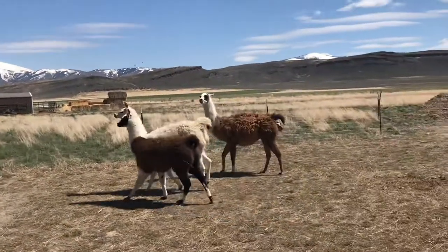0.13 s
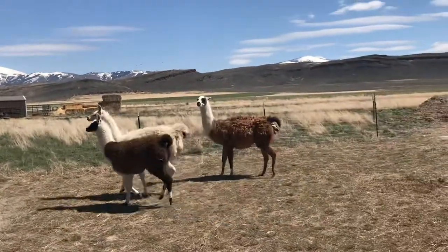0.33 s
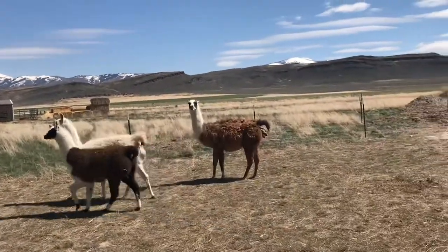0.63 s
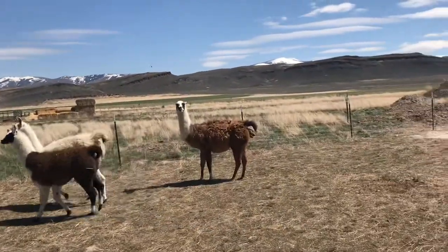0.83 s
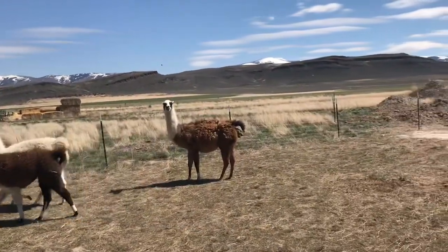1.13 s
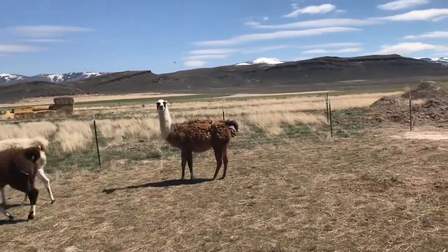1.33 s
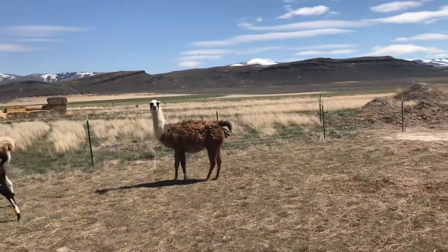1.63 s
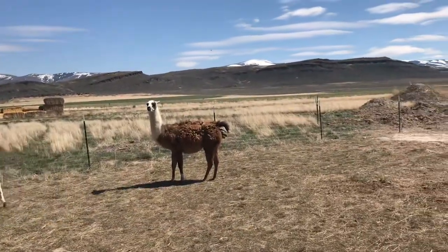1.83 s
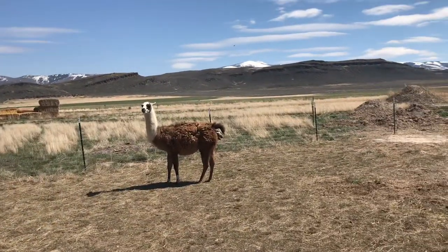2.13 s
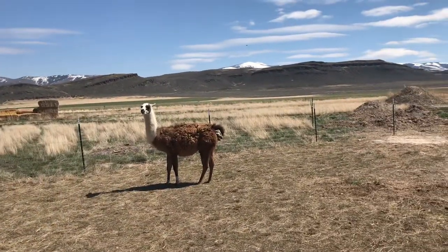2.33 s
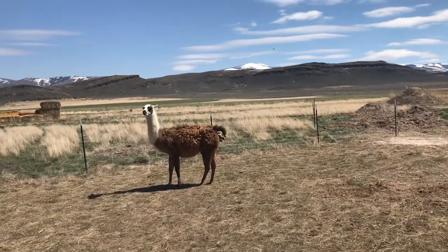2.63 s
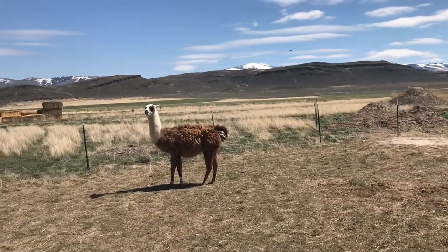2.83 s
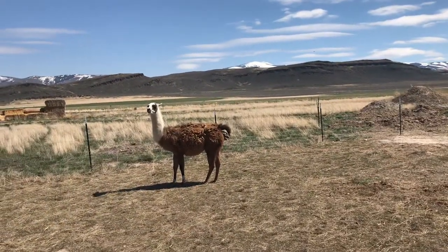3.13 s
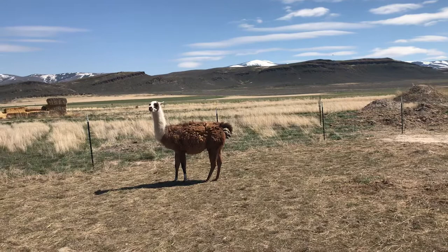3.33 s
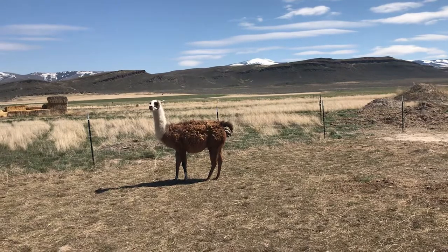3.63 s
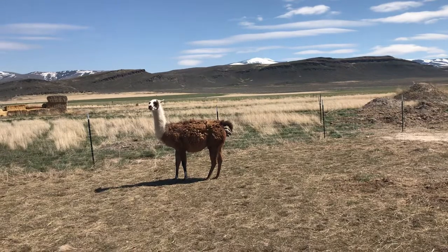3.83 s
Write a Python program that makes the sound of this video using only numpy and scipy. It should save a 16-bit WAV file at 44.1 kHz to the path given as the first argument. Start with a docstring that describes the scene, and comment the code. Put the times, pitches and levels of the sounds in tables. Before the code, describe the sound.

Wind buffets a small unprotected microphone in an open, dry pasture. The first 0.8 seconds are fairly calm, with low rumble, a couple of thumps, slight grass rustles and a tiny chirp. Gusts build from 0.85, turning loud, rasping and crackly around 1.5-1.8 and 2.5-2.8, then easing unevenly to 4.0. A very faint, nasal llama hum rises about 1.3-2.2, dipping last; faint distant chirps recur near 2.9.

```python
"""Gusty wind on a pasture microphone

Eddies of wind reach a small microphone: slow ones thump it as short swings of low pressure, and fast ones
tear into rasping puffs of noise whose treble grows with their strength. Coloured noise gives the rumble,
the flutter, the hiss of the field and the rustle of dry grass. Small birds chirp far off as gliding sines,
and an animal gives one thin, nasal hum, a sum of harmonics that rises and dips at its end.
"""
import sys
import numpy as np
from scipy import signal
from scipy.fft import rfft, irfft, next_fast_len
from scipy.io import wavfile
from scipy.ndimage import uniform_filter1d, minimum_filter1d, map_coordinates

SR = 44100
rng = np.random.default_rng(int(sys.argv[2]) if len(sys.argv) > 2 else 0)


def store_wav(level_fs):
    """Save 16-bit WAV to argv[1]."""
    pcm = np.round(np.clip(np.atleast_2d(level_fs), -1, 1) * 32767)
    wavfile.write(sys.argv[1], SR, pcm.T.astype(np.int16))


N = 176400  # samples: four seconds

# Rumble of the wind between the eddies, before RUMBLE_DB: time_s, level_db
RUMBLE_LEVEL = [(0, -30), (.3, -28.5), (.65, -34), (.85, -18.5), (1.05, -32), (1.5, -20.5), (2.0, -26),
                (2.3, -24), (2.6, -24), (3.1, -24.5), (3.4, -26.5), (3.8, -26), (3.93, -31), (4.0, -39.5)]
# Low-mid flutter of small eddies: time_s, level_db
FLUTTER_LEVEL = [(0, -47.5), (.7, -49.5), (.85, -39), (1.15, -43.5), (1.4, -28.5), (1.8, -38), (2.3, -38),
                 (2.65, -34), (2.9, -36.5), (3.15, -41), (3.35, -39.5), (3.57, -33.5), (3.8, -42.5),
                 (3.94, -35), (4.0, -46)]
# Relative spectra of the rumble and the flutter: frequency_hz, density_db
RUMBLE_COLOUR = [(15, -43), (24, -23.5), (32, -20), (45, -1), (65, -1), (100, -6), (160, -10.5), (300, -27),
                 (600, -63), (1500, -83)]
FLUTTER_COLOUR = [(40, -19), (120, -6), (220, 5), (400, -5), (650, -10.5), (1200, -33.5), (2500, -70)]
RUMBLE_DB = -1
FLUTTER_SLOW_DB, FLUTTER_FAST_DB = 8, 10  # limits of the swings drawn at 35 and 150 knots a second

# Hiss of the open field: time_s, level_db
AIR_LEVEL = [(0, -53), (.45, -54.5), (.55, -61.5), (.95, -54.5), (1.05, -60.5), (1.22, -60), (1.3, -54.5),
             (2.2, -53), (2.5, -54.5), (3.5, -55.5), (4, -58.5)]
# Rustles of dry grass: centre_s, length_s (two standard deviations), level_db
RUSTLES = [(0.094, 0.052, -63), (0.292, 0.014, -57.5), (0.342, 0.029, -53.5), (0.463, 0.02, -58.5),
           (0.617, 0.087, -61.5), (0.792, 0.093, -64.5), (0.976, 0.026, -61), (1.263, .03, -58.5),
           (1.685, 0.033, -61.5), (2.142, .025, -61.5), (3.669, 0.055, -62.5)]
# Tiny high ticks: centre_s, level_db
TICKS = [(3.361, -51.5), (3.574, -52.5), (3.798, -53), (3.895, -52.5)]
# Relative spectra of the hiss, the grass and the ticks: frequency_hz, density_db
AIR_COLOUR = [(100, -0.5), (400, 3.5), (900, -4), (2000, -16), (4000, -18), (5500, -22), (9000, -23),
              (10400, -27), (12000, -23), (15800, -24)]
GRASS_COLOUR = [(500, -11.5), (1500, 2), (4000, -1.5), (6000, -3.5), (10000, -5), (13000, 0), (15800, -7.5)]
TICK_COLOUR = [(3000, -40), (8000, -11), (12000, -3.5), (15500, -3)]

# Bird chirps, before CHIRP_DB: start_s, length_s, first_hz, middle_hz, last_hz, level_db
CHIRPS = [(0, 0.013, 4100, 4390, 2950, -57), (0.291, 0.0095, 3000, 3400, 2980, -53.5),
          (1.031, 0.012, 3200, 3450, 3900, -68), (1.088, 0.02, 2140, 3110, 2200, -57),
          (2.342, .06, 3550, 3870, 4220, -68), (2.852, 0.039, 4600, 4350, 3750, -63.5),
          (2.886, 0.044, 4000, 3470, 3100, -63.5)]
CHIRP_DB = 5.5

# Slow eddies pushing on the diaphragm, before THUMP_WIDTH and THUMP_DB: centre_s, length_s, level_db
THUMPS = [(0.41, 0.0087, -10.5), (0.484, 0.028, -13), (0.775, 0.027, -17.5), (0.858, 0.032, -25),
          (0.96, 0.0087, -23), (1.167, 0.015, -9.5), (1.303, 0.058, -20.5), (1.489, 0.016, -9.5),
          (1.579, 0.016, -4.5), (1.786, 0.024, -7.5), (1.876, 0.015, -11.5), (1.957, 0.011, -5.5),
          (2.116, 0.02, -13.5), (2.201, 0.038, -13.5), (2.41, 0.091, -18), (2.523, 0.041, -10.5),
          (2.709, 0.029, -13), (2.767, 0.0093, -6.5), (2.979, 0.024, -15), (3.043, 0.021, -25),
          (3.1, 0.024, -14.5), (3.178, 0.037, -13.5), (3.637, 0.096, -23)]
THUMP_HZ, THUMP_SPREAD = 71.5, 0.18  # middle swing frequency and its relative spread
THUMP_WIDTH, THUMP_DB = 0.45, -3  # standard deviation of the swell per length; overall level

# Fast eddies, before PUFF_WIDTH and PUFF_DB: centre_s, length_s, level_db,
# reach_hz (where the turbulence falls by 20 dB at unit strength)
PUFFS = [(0.47,0.033,-39.5,1504), (0.573,0.0049,-20.5,677), (0.595,0.024,-32,550), (.725,0.0034,-40,1600),
         (0.852,0.027,-21.5,560), (.875,0.0098,-19,600), (.901,0.021,-22,604), (0.953,0.014,-19,848),
         (0.996,0.0065,-29,526), (1.025,0.012,-32,548), (1.047,0.0064,-34,552), (1.104,0.0086,-29.5,466),
         (1.169,0.01,-37.5,560), (1.21,0.0093,-31.5,513.5), (1.29,.014,-16.5,770), (1.338,0.014,-22,734),
         (1.414,0.028,-27,707), (1.481,0.021,-13,1406), (1.56,0.0047,-24.5,796.5), (1.584,0.028,-23,676),
         (1.627,0.0045,-14.5,1501.5), (1.689,0.0063,-24,896), (1.714,0.0092,-12,1752),
         (1.729,0.0068,-7.5,1801), (1.743,0.012,-9.5,1702.5), (1.778,0.023,-12.5,1551),
         (1.814,0.0084,-13.5,1603), (1.943,0.022,-19.5,911), (2.016,0.024,-19.5,747), (2.108,0.009,-25,736),
         (2.146,0.011,-21,1042), (2.172,0.021,-22,1069), (2.216,0.009,-18,776), (2.382,0.011,-24.5,983),
         (2.418,0.013,-19,778), (2.491,0.012,-15,899), (2.501,0.0014,-11,1902), (2.513,0.018,-10,1255.5),
         (2.538,0.0094,-12,1396), (2.565,0.018,-14.5,1148), (2.6,0.005,-18.5,1597), (2.693,0.02,-18,1154),
         (2.738,0.034,-24.5,1099.5), (2.777,0.0097,-3,2301), (2.811,0.013,-15,621), (2.857,0.012,-24.5,660),
         (2.983,.031,-23,668), (3.024,0.011,-13,1204), (3.052,0.021,-16,774), (3.104,0.031,-25,925),
         (3.16,0.0071,-20,1298), (3.187,0.029,-14.5,1309), (3.27,0.028,-34,780), (3.364,.012,-19,1198),
         (3.46,0.012,-25.5,1145), (3.499,0.0078,-17.5,580), (3.639,0.012,-20.5,750),
         (3.654,0.023,-15.5,980), (3.711,0.031,-26,480), (3.775,0.023,-22,635), (3.803,0.0068,-19,520),
         (3.822,0.01,-21.5,527), (3.881,0.0097,-23.5,699), (3.931,0.03,-28.5,509)]
# Spectrum of the turbulence before that fall: frequency_hz, density_db
PUFF_COLOUR = [(30, -22.5), (80, -3), (150, 3.5), (300, 1.5), (600, 3), (950, 0.5), (1300, 1), (2000, -3),
               (3200, -1.5), (6000, 1.5), (9000, -3)]
PUFF_DB, PUFF_SKIRT, PUFF_WIDTH = 1.5, 0.99, 0.39  # overall level; exponent and width per length of a swell
CRACKLE_DB, CRACKLE_RATE = 4, 360  # limit of the roughness inside a puff; its knots a second
BRIGHTEN = 0.39  # the reach grows as this power of the momentary strength
FAST_HZ = 2000  # reach at which the thinning below applies in full
THIN_DB, THIN_HZ = 7.5, 436  # bass loss towards 0 Hz, and the frequency scale over which it dies away
BAND_HZ = np.geomspace(150, 9600, 13)  # centres of the bands of turbulence

# Pitch of the animal's hum, before a slight unsteadiness: time_s, pitch_hz
HUM_PITCH = [(1.3, 251), (1.43, 254), (1.49, 261), (1.55, 267), (1.68, 271), (1.8, 278.5), (1.95, 283),
             (2.08, 280), (2.125, 276), (2.17, 258)]
# Level of the hum: time_s, level_db
HUM_LEVEL = [(1.3, -76), (1.38, -64), (1.55, -64.5), (1.68, -62), (1.8, -60.5), (1.95, -58), (2.08, -60.5),
             (2.125, -62), (2.17, -72)]
# Relative strength of its harmonics, interpolated between rows: harmonic_number, level_db
HARMONICS = [(1, -8), (4, -8), (5, -5), (6, -2), (7, -11), (8, -7), (9, -7), (10, -17), (11, -19),
             (12, -12), (13, -2), (14, -11), (15, 4), (16, -6), (17, -7), (18, -22), (24, -23), (28, -14),
             (31, -19), (35, -32)]

LOW_CUT_HZ, TOP_HZ = 29, 15800  # microphone passes half the amplitude here; upper band limit
CEILING_DB = -0.15  # limiter ceiling, relative to full scale


def amp(db):
    """Decibel law: twenty decibels are a tenfold amplitude."""
    return 10 ** (np.asarray(db) / 20)


def unit(x):
    """Normalisation of a signal to a root mean square of 1."""
    return x / np.sqrt(np.mean(x ** 2) + 1e-20)


def along(points, hz):
    """Interpolation of (frequency, value) points on a logarithmic frequency axis."""
    point_hz, values = np.transpose(points)
    return np.interp(np.log(hz + 1), np.log(point_hz + 1), values)


def curves(rows):
    """Linear interpolation in time: one value per sample for each column after the time."""
    times, *columns = np.transpose(rows)
    return [np.interp(np.arange(N) / SR, times, column) for column in columns]


def wobble(rate, size=N):
    """Smooth random fluctuation: a spline through normal draws, rate knots a second."""
    knots = rng.standard_normal(size // 8)
    return map_coordinates(knots, [np.arange(size) * rate / SR], mode="wrap")


def filtered(x, response):
    """Linear filtering: the spectrum multiplied by a response of frequency."""
    padded = next_fast_len(len(x) + 4096)
    spectrum = rfft(x, padded) * response(np.fft.rfftfreq(padded, 1 / SR))
    return irfft(spectrum, padded)[:len(x)]


def noise(colour):
    """Coloured noise: white noise shaped by a spectrum, at rms 1."""
    white = rng.standard_normal(N)
    return unit(filtered(white, lambda hz: amp(along(colour, hz))))


def add(out, x, centre_s):
    """Superposition: x is summed into out around a moment."""
    index = round(centre_s * SR) - len(x) // 2 + np.arange(len(x))
    inside = (index >= 0) & (index < N)
    out[index[inside]] += x[inside]


def steady_wind():
    """Broadband turbulence: rumble and a restless flutter of small eddies go on between the large ones."""
    rumble_db, = curves(RUMBLE_LEVEL)
    flutter_db, = curves(FLUTTER_LEVEL)
    slow_swing_db = FLUTTER_SLOW_DB * np.tanh(wobble(35))
    fast_swing_db = FLUTTER_FAST_DB * np.tanh(wobble(150))
    rumble = amp(rumble_db + RUMBLE_DB) * noise(RUMBLE_COLOUR)
    flutter = unit(noise(FLUTTER_COLOUR) * amp(slow_swing_db + fast_swing_db))
    return rumble + amp(flutter_db) * flutter


def field(tick_s=0.002):
    """Amplitude-modulated noise: soft hiss of the field, grainy rustles of grass and a few tiny ticks."""
    t = np.arange(N) / SR
    air_db, = curves(AIR_LEVEL)
    hiss = amp(air_db + 1.5 * wobble(40)) * noise(AIR_COLOUR)
    rustle_swell = sum(amp(db) * np.exp(-2 * ((t - centre) / length) ** 2) for centre, length, db in RUSTLES)
    grass = unit(noise(GRASS_COLOUR) * amp(3.5 * wobble(500)))
    tick_swell = sum(amp(db) * np.exp(-np.abs(t - centre) / tick_s) for centre, db in TICKS)
    return hiss + rustle_swell * grass + tick_swell * noise(TICK_COLOUR)


def birds(echo_db=-10, echo_t60=0.23):
    """Frequency modulation: short gliding whistles, with a faint, decaying scatter from the field."""
    out = np.zeros(N)
    for start, length, first, middle, last, db in CHIRPS:
        progress = np.linspace(0, 1, int(length * SR))
        glide_hz = np.interp(progress, [0, 0.5, 1], [first, middle, last])
        glide_hz = glide_hz * (1 + 0.02 * wobble(300)[:len(progress)])
        whistle = np.sin(2 * np.pi * np.cumsum(glide_hz) / SR)
        add(out, amp(db + CHIRP_DB) * np.sin(np.pi * progress) * whistle, start + length / 2)
    t = np.arange(SR // 4) / SR
    tail = rng.standard_normal(len(t)) * amp(-60 * t / echo_t60)
    scatter = signal.fftconvolve(out, tail / np.linalg.norm(tail))[:N]
    return out + amp(echo_db) * scatter


def thumps(size=8192):
    """Pressure oscillation: a slow eddy swings the pressure to and fro, briefly and unevenly."""
    out = np.zeros(N)
    t = (np.arange(size) - size // 2) / SR
    for centre, length, db in THUMPS:
        hz = THUMP_HZ * np.exp(THUMP_SPREAD * wobble(106.3, size))
        swing = np.sin(2 * np.pi * (np.cumsum(hz) / SR + rng.random()))
        swell = np.exp(-(t / (THUMP_WIDTH * length)) ** 2 / 2)
        add(out, amp(db + THUMP_DB) * unit(swing) * swell, centre)
    return out


def puffs(size=8192):
    """Level-dependent spectrum: a fast eddy is a crackling swell, brightest where it is strongest."""
    out = np.zeros(N)
    t = (np.arange(size) - size // 2) / SR
    hz = np.fft.rfftfreq(size, 1 / SR)
    # overlapping triangular bands, so that each can follow the strength from moment to moment
    bands = np.array([np.interp(hz, BAND_HZ, one) for one in np.eye(len(BAND_HZ))])
    bands = bands * amp(along(PUFF_COLOUR, hz)) * (hz < BAND_HZ[-1])
    band_hz = BAND_HZ[:, None]
    for centre, length, db, reach in PUFFS:
        swell = np.exp(-np.abs(t / (PUFF_WIDTH * length)) ** PUFF_SKIRT / 2)
        crackle = amp(CRACKLE_DB * np.tanh(wobble(CRACKLE_RATE, size)))
        live = swell > 1e-3
        strength = (swell * crackle + 1e-9)[live]
        turbulence = irfft(bands * np.exp(2j * np.pi * rng.random(len(hz))))[:, live]
        treble_fall = amp(-20 * band_hz / (reach * strength ** BRIGHTEN))
        # the fastest eddies are small and so carry less bass
        bass_loss = amp(-THIN_DB * (reach / FAST_HZ) ** 2 * np.exp(-band_hz / THIN_HZ))
        puff = strength * (turbulence * treble_fall * bass_loss).sum(axis=0)
        # the energy equals that of a steady sound at the level, lasting the length
        spread = np.sqrt(length * SR / len(puff))
        add(out, amp(db + PUFF_DB) * unit(puff) * spread, centre)
    return out


def animal():
    """Harmonic series: one nasal hum, slightly unsteady, strongest near 4 kHz, each harmonic wavering."""
    t = np.arange(N) / SR
    hz, = curves(HUM_PITCH)
    level_db, = curves(HUM_LEVEL)
    hz = hz * (1 + 0.0015 * wobble(45))
    phase = 2 * np.pi * np.cumsum(hz) / SR
    orders, order_db = np.transpose(HARMONICS)
    voice = np.zeros(N)
    for k in range(1, 34):
        harmonic_db = np.interp(k, orders, order_db) + 1.3 * wobble(10)
        voice += amp(harmonic_db) * np.sin(k * phase + 2 * np.pi * rng.random())
    sounding = (t > HUM_LEVEL[0][0]) & (t < HUM_LEVEL[-1][0])
    return unit(voice) * amp(level_db) * sounding


def scene():
    """Superposition of all sources, heard by a microphone that passes little of the deepest bass."""
    sound = steady_wind() + field() + birds() + thumps() + puffs() + animal()
    return filtered(sound, lambda hz: 1 - 1 / (1 + (hz / LOW_CUT_HZ) ** 6))[None]


def record(dry, size=90):
    """Peak limiting and band limiting: a fast gain holds the highest peaks, then the top is cut off."""
    needed = np.minimum(1, amp(CEILING_DB) / (np.abs(dry[0]) + 1e-9))
    gain = minimum_filter1d(needed, size)
    for _ in range(2):  # smooth the gain twice
        gain = uniform_filter1d(gain, size // 2)
    return filtered(dry[0] * gain, lambda hz: hz < TOP_HZ)[None]


dry = scene()
out = record(dry)
store_wav(out)
```